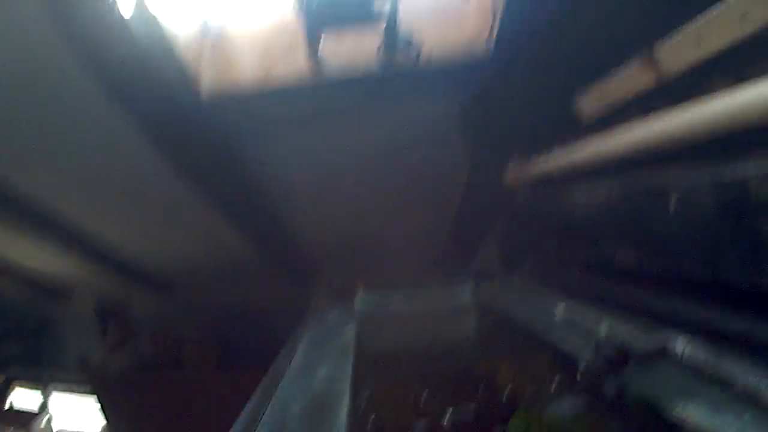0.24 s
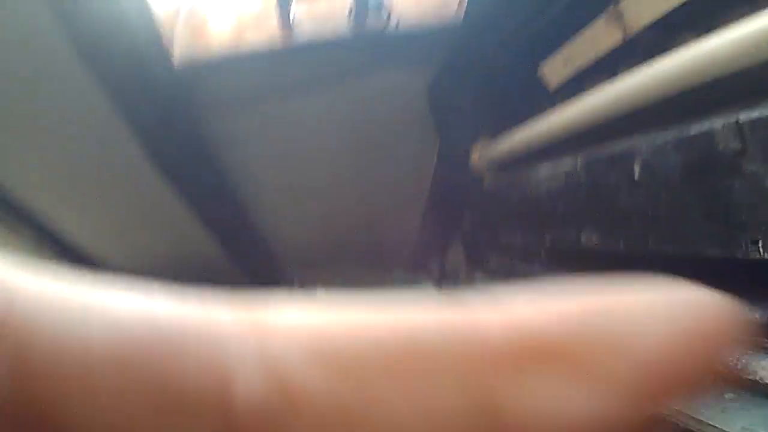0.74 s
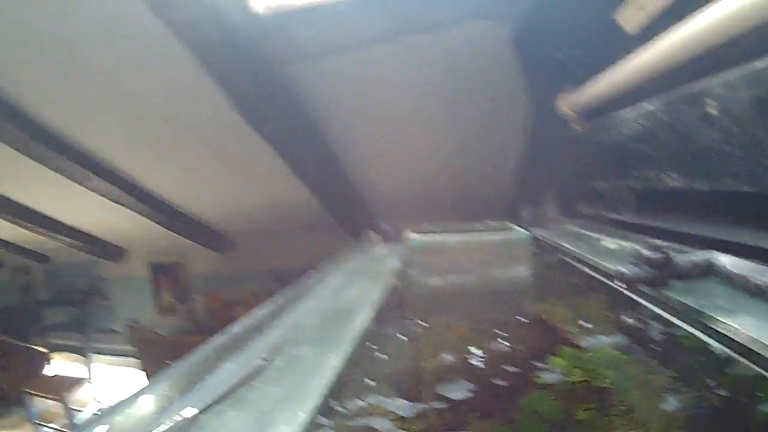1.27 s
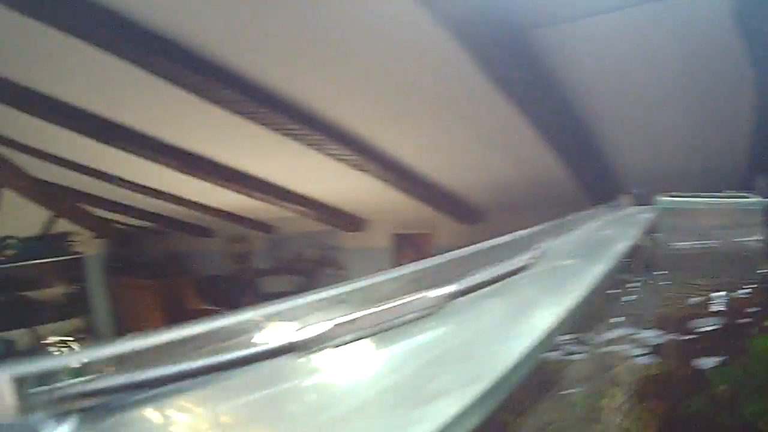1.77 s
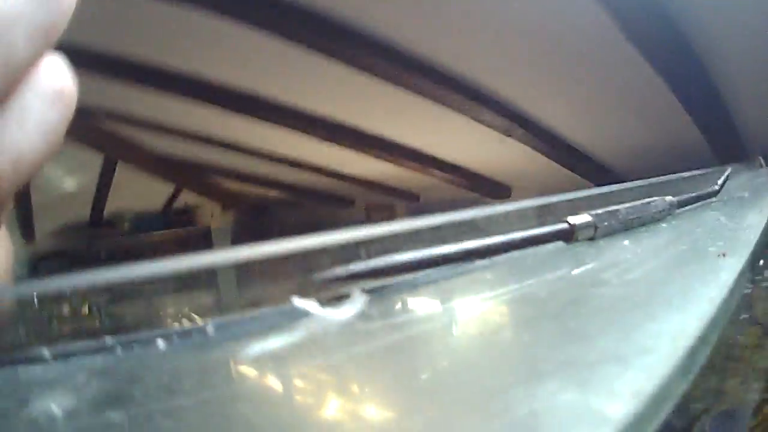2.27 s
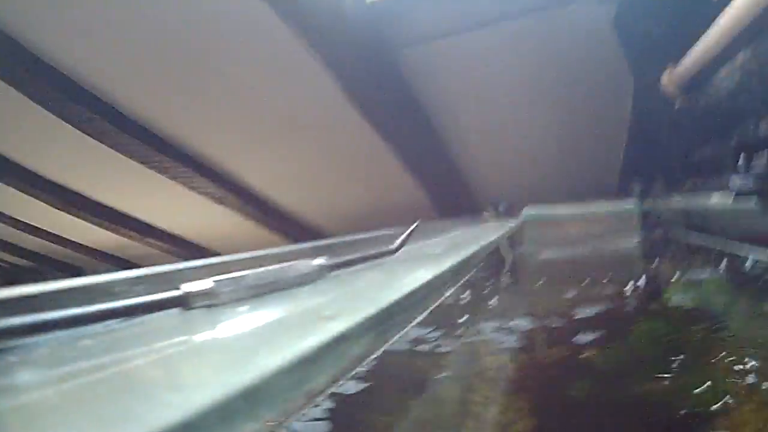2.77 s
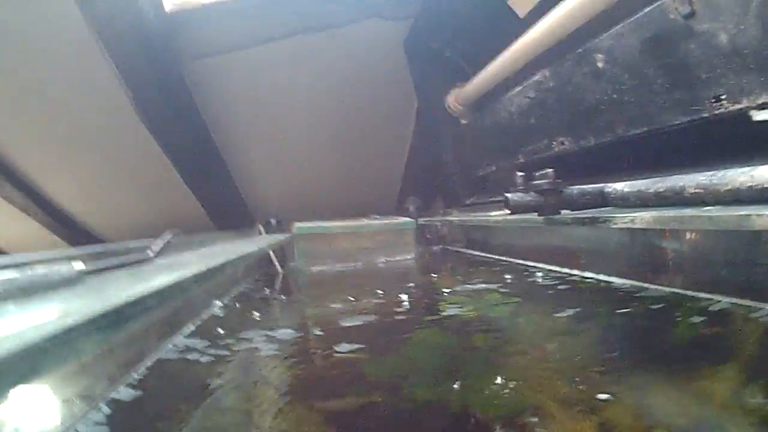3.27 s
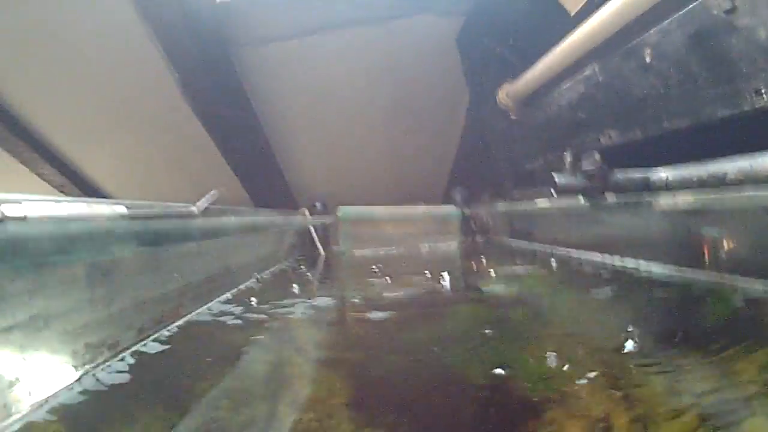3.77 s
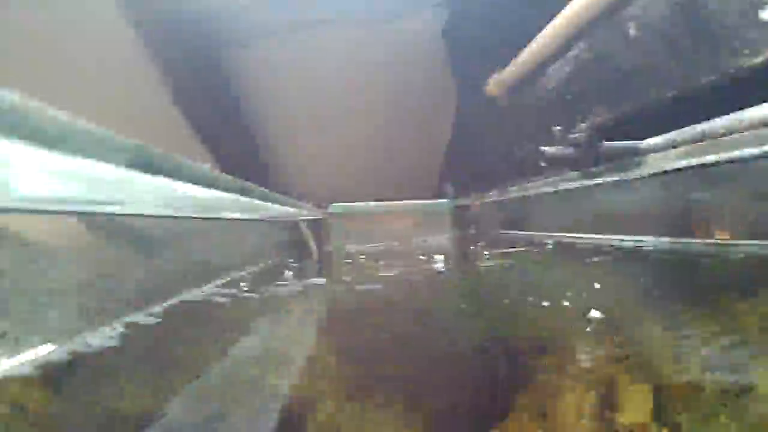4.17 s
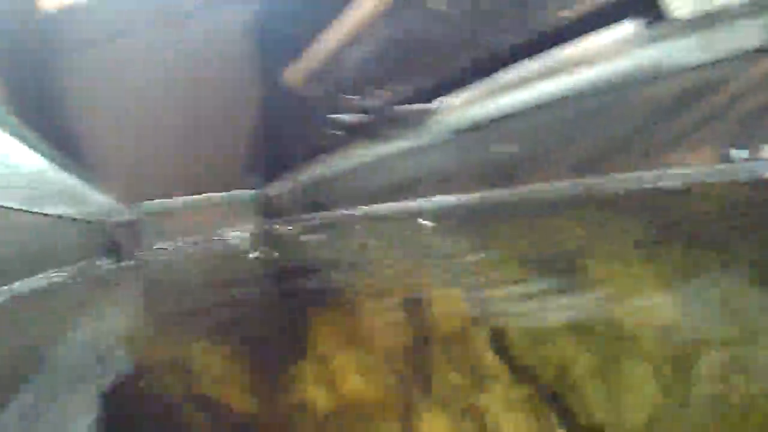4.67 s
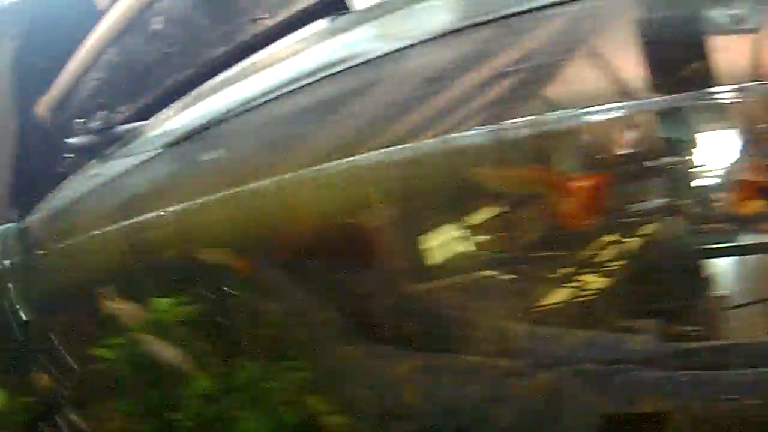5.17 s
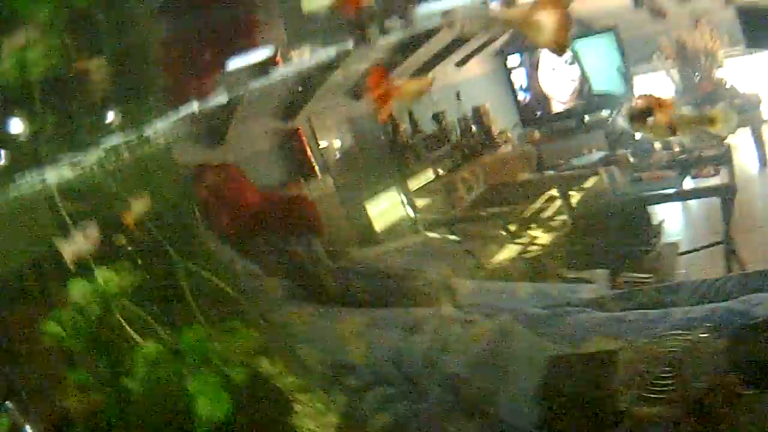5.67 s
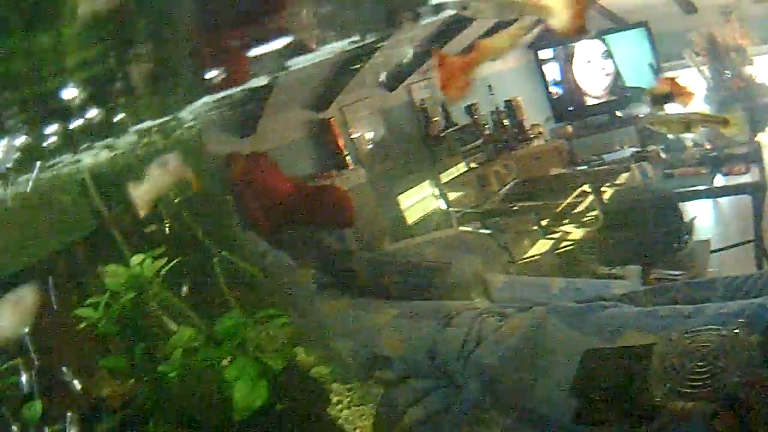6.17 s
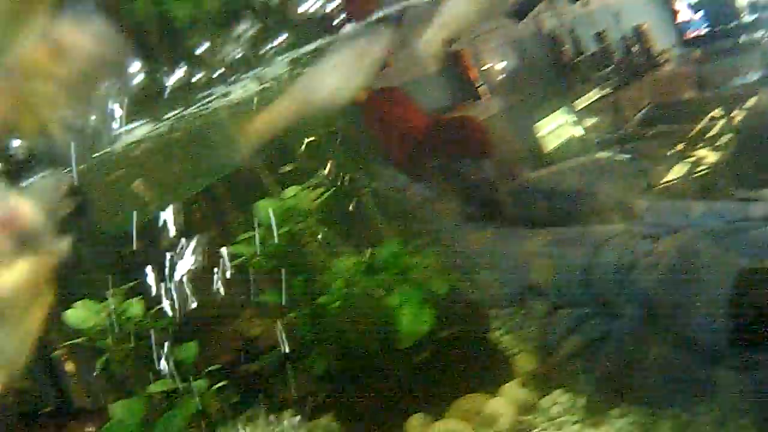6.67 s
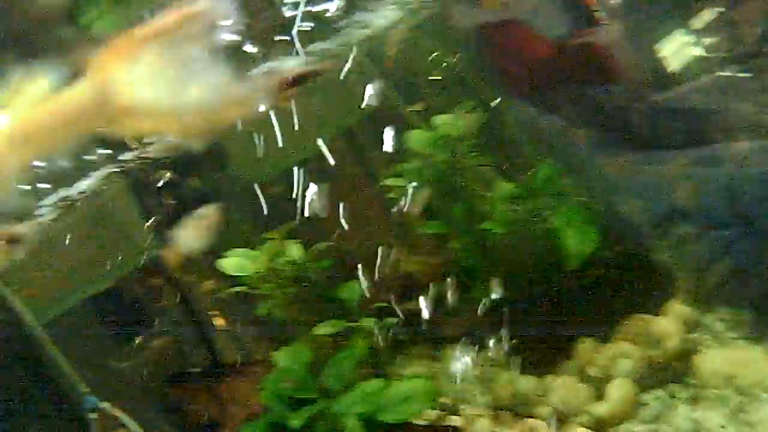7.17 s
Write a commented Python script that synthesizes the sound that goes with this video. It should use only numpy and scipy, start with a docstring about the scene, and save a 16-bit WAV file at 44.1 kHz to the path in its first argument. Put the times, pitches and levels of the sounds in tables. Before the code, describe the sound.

From inside a sealed plastic housing, close and muffled: a quick cluster of knocks with finger rubbing, a near-quiet pause, then loud hollow clacks. A juddering scrape on the glass rim quickens into crowded wet slips as the case goes under. Dull bumps follow, a heavy glassy boom rolls through the fish tank, and a low pump drone with watery wash takes over, dotted with soft round plops.

```python
"""Thuds, hollow knocks and a quickening judder, then wet slips, round plops, a glassy boom and a muffled drone.
A small camera in a waterproof housing is handled, bumped along the glass rim of a fish tank and dipped under.
Each contact pushes the trapped air (a filtered half-sine) and rings the shell (dying sines that water lowers).
Random grains through resonances make rubbing fingers, wet dragging, the pump with its air stream, and fizz.
Blows on the glass sound the tank's own modes; shaped noise gives the grip's rumble and the noise floor."""
import sys
import numpy as np
from scipy import signal
from scipy.fft import rfft, irfft
from scipy.io import wavfile
from scipy.ndimage import map_coordinates

SR = 44100
rng = np.random.default_rng(int(sys.argv[2]) if len(sys.argv) > 2 else 0)


def wav_record(signal):
    """Record a signal, one row per channel, as 16-bit PCM in the file named by sys.argv[1]."""
    frames = np.transpose(np.atleast_2d(signal))
    bounded = np.clip(frames, -1, 1)
    # unit amplitude maps onto the largest positive 16-bit level
    quanta = np.round(bounded * 32767).astype(np.int16)
    wavfile.write(sys.argv[1], SR, quanta)


N = 327663
TIME = np.arange(N) / SR
MAIN_HZ = 1220   # nominal main ring of the dry housing, the reference for added mass
# modes of the dry housing: f/Hz, level/dB, t60/s
HOUSING_MODES = [(526, -22.5, 0.041), (665.6, -18, 0.043), (808, -12.5, 0.037), (1235.8, -0.5, 0.034),
                 (1413, -21, 0.045), (1630, -7.5, 0.02), (2241, -17, 0.021), (2709, -16.5, 0.013),
                 (3155, -19.5, 0.018), (3422, -19.5, 0.011)]


def knocks():
    """Fingers and glass strike the housing, each time at another spot: a thud, a ring and a short crunch."""
    # single knocks: t/s, case pressed in +1 or released -1, push on the trapped air/dB, contact/ms,
    #                nominal main ring f/Hz, ring level/dB, clatter of the other modes against the ring/dB
    knock_rows = [(0.2447, -1, -15.5, 3.37, 998, -19, 8.5), (0.277, 1, -26, 2.4, 1320, -20.5, 2),
                  (0.3297, 1, 3, 7.2, 1170, -7.5, 7), (0.336, -1, -2.5, 1.54, 1294, -2.5, 0),
                  (0.3942, -1, -17, 4.4, 1320, -28, 11), (0.4463, 1, -10.5, 3.5, 1220, -20.5, 0.5),
                  (2.4002, -1, 8, 2.48, 722, 12, -5), (2.424, 1, -1, 5.45, 1180, 8.5, -2),
                  (2.654, -1, -5, 2.7, 1210, 1.5, 0), (2.9418, 1, -7, 5.65, 1168, 1, -1),
                  (2.9476, -1, -10.5, 5, 1202, 1, -1.5), (3.375, -1, -34, 8, 1220, -28, -2),
                  (4.093, 1, -10.5, 7.3, 1176, -19, 4), (4.5197, 1, -12.5, 5.5, 1224, -8, -2.5),
                  (4.7814, -1, -7, 2, 1084, -6.5, -2), (5.2765, -1, -8, 2.9, 1012, -10.5, 3.5),
                  (5.283, -1, -3, 2.8, 1017, -3.5, -10), (5.69, 1, 0, 5.17, 824, 2, 3.5),
                  (5.9768, -1, 11, 4.34, 844, -21.5, 19.5), (5.9808, 1, -10.5, 7.8, 719, -9, 0)]
    low_db, overtone_db, crunch_db = -0.25, 1.5, -20   # against the clatter
    slope_db = -1.8   # overtones, per octave
    out = np.zeros(N)
    for s, direction, push_db, contact_ms, main_hz, ring_db, clatter_db in knock_rows:
        others_db = ring_db + clatter_db
        ring = shell_ring(main_hz, ring_db, others_db + low_db, others_db + overtone_db, slope_db)
        push = np.sign(direction) * from_db(push_db)
        add(out, s, contact(push, contact_ms, ring, grit_db=-15.5, release_db=-16.5))
        add(out, s, crunch(others_db + crunch_db, t60=0.043, low_hz=300, top_hz=2800))
    return out


def judder():
    """Dry plastic catches on the rim and lets go, at first ever faster; harder catches ring brighter."""
    # catches on the glass rim: t/s, push level/dB, main ring level/dB, overtone level/dB
    catches = [(3.0391, 3.5, -13, -1.5), (3.1914, -4, -17.5, -4.5), (3.54, 3, -1.5, 2),
               (3.6495, 1, -12, -8.5), (3.7606, 2.5, -6, -2), (3.8606, -3.5, -26, -5.5),
               (3.9349, -1, -11, -2), (3.993, -2.5, -9.5, -5.5), (4.059, -4, -15.5, -12),
               (4.132, -2.5, -6.5, -2.5), (4.1666, -3, -10, -10), (4.1957, -5, -13, -8),
               (4.224, -7.5, -17.5, -19.5), (4.2545, -10.5, -24.5, -15), (4.282, -10.5, -28, -30.5),
               (4.3624, -5, -7.5, -3.5), (4.4184, -10.5, -14, -18), (4.488, -11, -32, -29)]
    contact_ms, main_hz = 12.9, 1191
    low_db, low_follows = -3, 0.8   # low modes at 0 dB push; dB per dB of push
    slope_db, brightens = 5.5, 0.85   # overtones per octave at 0 dB push; dB per dB of push
    snap_db, snap_follows, snap_hz = -5, 2.4, 2950   # at 0 dB overtones; dB per dB of overtones
    out = np.zeros(N)
    for s, push_db, ring_db, overtone_db in catches:
        modes_below_db = low_db + low_follows * push_db
        brightness_db = slope_db + brightens * push_db
        ring = shell_ring(main_hz, ring_db, modes_below_db, overtone_db, brightness_db)
        add(out, s, contact(-from_db(push_db), contact_ms, ring, grit_db=-23, release_db=-19.5))
        add(out, s, snap(snap_db + snap_follows * overtone_db, snap_hz))
    return out


def slips():
    """Short wet slips press the case in; the harder the push, the more the side modes speak."""
    # sticking and slipping at the water line: t/s, push level/dB, contact/ms, main ring level/dB
    slip_rows = [(4.3203, -0.5, 7.4, -9.5), (4.401, -5.5, 6.9, -8.5), (4.4394, -5.5, 6.3, -8),
                 (4.47, -8, 6.6, -14.5), (4.499, -18, 10, -20.5), (4.54, -12, 5.1, -21),
                 (4.549, -15, 3, -12), (4.567, -7.5, 4.95, -13.5), (4.5861, -13, 3.9, -12),
                 (4.6027, -3, 4.5, -6), (4.6362, -1.5, 3.7, -9.5), (4.6659, 3.5, 4.25, -5.5),
                 (4.7199, 4.5, 4.4, -5), (4.7749, 2.5, 3, -5), (4.8066, -1.5, 3.8, -8.5),
                 (4.8364, 3, 3.97, -12), (4.8863, 2, 3.35, 0.5), (4.9347, -2.5, 4.9, -4.5),
                 (4.99, 2.5, 9.9, -20), (5.027, -6, 9, -17.5), (5.0611, -8, 11, -15)]
    # each level at 0 dB push, then its rise in dB per dB of push
    low_db, low_follows = -9, 1.9
    overtone_db, overtone_follows, slope_db = -2.5, 0.91, -5   # slope per octave
    crunch_db, crunch_follows = -16.5, 0.75
    out = np.zeros(N)
    for s, push_db, contact_ms, ring_db in slip_rows:
        modes_below_db = low_db + low_follows * push_db
        modes_above_db = overtone_db + overtone_follows * push_db
        ring = shell_ring(slip_ring_hz(s), ring_db, modes_below_db, modes_above_db, slope_db)
        add(out, s, contact(from_db(push_db), contact_ms, ring, grit_db=-13.5, release_db=-19))
        add(out, s, crunch(crunch_db + crunch_follows * push_db, t60=0.041, low_hz=435, top_hz=2115))
    return out


def bumps():
    """The case springs back under the water with a dull thud and hardly any ring."""
    # dull bumps: t/s, push level/dB
    bump_rows = [(4.9548, -3.5), (5.0864, -6.5), (5.131, -9.5), (5.153, -14), (5.1796, -9), (5.209, -13.5),
                 (5.2241, -10.5)]
    ring_db, low_db, overtone_db, slope_db = -21.5, -18, -15, 2.3   # before the push gain; slope per octave
    out = np.zeros(N)
    for s, push_db in bump_rows:
        ring = shell_ring(slip_ring_hz(s), ring_db, low_db, overtone_db, slope_db)
        bump = contact(-0.96, 4.52, ring, grit_db=-7, release_db=-17)
        add(out, s, from_db(push_db) * bump)
    return out


def taps(low_hz):
    """Light touches under water ring the shell with a round plop and only a faint thud."""
    # soft taps: t/s, level/dB, hardness as a low-pass corner f/Hz, overtone boost/dB
    tap_rows = [(6.532, -42, 3100, 20), (6.6272, -1.5, 660, -5), (7.2412, -9.5, 1510, 9),
                (7.395, -4, 680, -4.5)]
    # modes of the sunken housing: f/Hz, level/dB, t60/s
    sunken_modes = [(610, -24.5, 0.16), (660, 1, 0.052), (743, -3.5, 0.043), (1217, -8, 0.021),
                    (1625, -11.5, 0.029), (2660, -22, 0.0139)]
    thud_db, contact_ms = -21.5, 2.2   # push on the trapped air, against the tap's level
    hz, mode_db, t60 = np.transpose(sunken_modes)
    upper = hz > 1000
    out = np.zeros(N)
    for s, db, hardness_hz, overtone_db in tap_rows:
        gains = from_db(db + mode_db + overtone_db * upper)
        plop = cut(ringing(hz, gains, t60, TIME[:SR // 8]), hardness_hz, "low")
        plop = cut(plop, low_hz, "high", order=5)
        add(out, s, plop + thud(from_db(db + thud_db), contact_ms))
    return out


def tank():
    """Under water, a blow on the glass booms through the whole tank and shakes its water."""
    # blows that set the filled tank ringing: t/s, level/dB
    blows = [(5.2836, -26), (5.687, -16.5), (5.979, -2.5), (7.244, -30.5)]
    # modes of the glass and its water: f/Hz, level/dB, t60/s
    tank_modes = [(142.8, -0.5, 0.16), (184, -11, 0.049), (224, -2.5, 0.1), (331.4, -4, 0.12),
                  (483, -25.5, 0.19), (753, -2, 0.074)]
    slosh_db, slosh_t60_s = -18, 0.27   # the shaken water, against the blow
    hz, mode_db, t60 = np.transpose(tank_modes)
    out = np.zeros(N)
    for s, db in blows:
        add(out, s, ringing(hz, from_db(db + mode_db), t60, TIME[:SR // 2]))
        add(out, s, crunch(db + slosh_db, slosh_t60_s, low_hz=109, top_hz=304))
    return out


def after_ring(hits, level_db, t60, low_hz):
    """Glass and room answer each hit with a faint diffuse tail of decaying noise."""
    t = TIME[:SR // 2]
    tail = rng.standard_normal(len(t)) * np.exp(-np.log(1000) * t / t60)
    tail = tail / np.sqrt(np.sum(tail ** 2))
    return from_db(level_db) * signal.fftconvolve(cut(hits, low_hz, "high"), tail)[:N]


def dragging(main_hz, damping, bright_db):
    """Wet plastic sticks and slips on the glass; its friction grains ring the water-loaded shell."""
    # the housing dragging along the glass as it goes under: t/s, level/dB
    drag_curve = [(4.1, -92.5), (4.3, -48), (4.42, -38.5), (4.58, -37.5), (4.75, -42.5), (5.22, -41),
                  (5.33, -54.5), (5.6, -87)]
    flutter_db = 3
    friction = grains(per_s=500, spread_db=2.5) * from_db(flutter_db * drift(89))
    shell = np.zeros(N)
    for k, (hz, db, t60) in enumerate(HOUSING_MODES):
        octaves_away = abs(np.log2(hz / MAIN_HZ))
        mode = resonate(friction, loaded(hz, main_hz), damping / t60)
        shell += (-1) ** k * from_db(db + bright_db * octaves_away) * mode
    return from_db(in_time(drag_curve)[0]) * rms_one(shell)


def rubbing():
    """Tiny slips of skin on dry plastic excite the resonances of the hand-held shell."""
    # finger strokes: t/s, length/s, level/dB that the swell heads for
    rub_rows = [(0.07, 0.0041, -41), (0.112, 0.16, -44), (0.24, 0.12, -36), (0.36, 0.14, -40.5),
                (0.447, 0.08, -25), (0.53, 0.048, -32), (0.575, 0.06, -40.5), (0.7, 0.041, -48),
                (0.805, .04, -46.5), (0.858, 0.018, -43), (0.895, 0.03, -50.5), (1.608, 0.0067, -42),
                (1.66, 0.031, -51), (1.753, 0.013, -46), (1.805, 0.015, -50.5), (1.875, 0.027, -42),
                (1.96, 0.08, -56.5), (2.782, 0.011, -47.5), (2.995, 0.028, -48.5), (3.117, 0.051, -48.5)]
    # resonances of the hand-held shell: f/Hz, width/Hz, level/dB
    held_modes = [(824, 32, -9.5), (1221, 132, 0.5), (1710, 93, -5.5), (1750, 1100, -15), (2494, 160, -9.5),
                  (2540, 490, -19.5), (3700, 230, -26)]
    skin = grains(per_s=2500, spread_db=3.5) * from_db(2.2 * drift(60))
    shell = np.zeros(N)
    for k, (hz, width_hz, db) in enumerate(held_modes):
        shell += (-1) ** k * from_db(db) * resonate(skin, hz, width_hz)
    return strokes(rub_rows, attack_s=0.0065, release_s=0.015) * rms_one(cut(shell, 150, "high"))


def grip():
    """The hand's changing pressure flexes the sealed case: a slow rumble of shaped noise."""
    # pressure of the grip: t/s, level/dB
    grip_curve = [(0, -36), (.25, -28), (.44, -19.5), (.7, -34.5), (1.1, -35), (2.3, -41), (3.05, -29.5),
                  (3.42, -36.5), (3.7, -26.5), (5.2, -32), (5.45, -44), (7.43, -41.5)]
    # rumble spectrum: f/Hz, relative level per Hz/dB
    grip_colour = [(12, 3.5), (22, 2.5), (35, -15.5), (60, -22.5), (120, -31), (250, -38), (500, -60.5)]
    rumble = cut(coloured(rng.standard_normal(N), grip_colour), 9.8, "high")
    return from_db(in_time(grip_curve)[0]) * rms_one(rumble)


def pump(pump_db, wet_hz, width_hz, drone_db, wash_db):
    """Churning water and the air stream drone through the gliding resonance of the wet shell, over a wash."""
    # wash spectrum: f/Hz, relative level per Hz/dB
    wash_colour = [(60, 2.5), (200, -1), (400, -3.5), (700, -4), (1100, -23), (1400, -4.5), (1620, 6),
                   (1900, -7.5), (2300, -17.5), (2800, -11.5), (3300, -15.5), (3900, -17)]
    churn = grains(per_s=9000, spread_db=6.5) * from_db(1.9 * drift(36))
    drone = resonate(resonate(churn, wet_hz, width_hz), wet_hz, width_hz)
    wash = coloured(grains(per_s=5700, spread_db=2.5), wash_colour)
    return from_db(pump_db) * (from_db(drone_db) * rms_one(drone) + from_db(wash_db) * wash)


def fizz():
    """Clouds of fine bubbles pass the housing: dense grains through two broad resonances."""
    # bubble clouds: t/s, length/s, level/dB that the swell heads for
    clouds = [(6.37, 0.23, -50.5), (7.24, 0.085, -45.5)]
    bubbles = resonate(resonate(grains(per_s=1500, spread_db=2), 2630, 590), 2450, 970)
    return strokes(clouds, attack_s=0.066, release_s=0.035) * rms_one(bubbles)


def noise_floor(level_db):
    """A faint steady bed of shaped noise."""
    # bed spectrum: f/Hz, relative level per Hz/dB
    floor_colour = [(40, -10), (100, -3), (250, -1.5), (500, -6.5), (900, -9), (1220, -9), (1500, -8.5),
                    (2200, -14.5), (3000, -15), (3900, -15)]
    return from_db(level_db) * coloured(rng.standard_normal(N), floor_colour)


def contact(push, contact_ms, ring, grit_db, release_db):
    """One contact: a thud, and the shell's ring set off by the chattering touch."""
    rung = signal.fftconvolve(ring, chatter(contact_ms, grit_db, release_db))[:len(ring)]
    return thud(push, contact_ms) + cut(rung, 483, "high", order=3)


def thud(push, contact_ms):
    """A soft half-sine push on the trapped air."""
    phase = np.minimum(TIME[:SR // 8] * 1000 / contact_ms, 1)
    return cut(push * np.sin(np.pi * phase), 454, "low", order=1)


def chatter(contact_ms, grit_db, release_db):
    """A contact is a first touch, a few gritty slips while it lasts, and a tick as it lets go."""
    length = max(int(contact_ms * SR / 1000), 2)
    at, size = rng.random(6), rng.standard_normal(6)
    force = np.zeros(length)
    force[(at * length).astype(int)] = from_db(grit_db) * size
    force[0], force[-1] = 1, -from_db(release_db)
    return force


def shell_ring(main_hz, main_db, low_db, overtone_db, slope_db, build_cycles=0.36):
    """The shell's main mode, the modes below it and its overtones, each group at its own level."""
    hz, mode_db, t60 = np.transpose(HOUSING_MODES)
    octaves, t = np.log2(hz / hz[3]), TIME[:SR // 8]   # row 3 is the main mode
    signs = np.where(hz > 2000, (-1) ** np.arange(1, len(hz) + 1), 1)
    groups = [octaves < 0, octaves > 0]
    db = mode_db + np.select(groups, [low_db, overtone_db + slope_db * octaves], main_db)
    # each spot of the shell tunes the overtones a little differently
    detune = 1 + 0.034 * rng.standard_normal(len(hz)) * (octaves > 0)
    ring = ringing(loaded(hz, main_hz) * detune, signs * from_db(db), t60, t)
    return ring * (1 - np.exp(-t * main_hz / build_cycles))   # the swing takes a moment to build


def slip_ring_hz(s):
    """Nominal main ring of the shell while it crosses the water line."""
    # half-sunken shell: t/s, nominal main ring f/Hz
    ring_curve = [(4.3, 826), (4.84, 786), (4.92, 1023), (5.06, 930), (5.22, 815)]
    return np.interp(s, *np.transpose(ring_curve))


def loaded(hz, main_hz):
    """Water or a firm grip adds mass: low modes drop with the main ring, overtones less."""
    return hz * (main_hz / MAIN_HZ) ** np.minimum(1, MAIN_HZ / hz)


def crunch(db, t60, low_hz, top_hz):
    """Many small modes dying together, as a short rough burst of noise."""
    t = TIME[:SR // 4]
    noise = cut(rng.standard_normal(len(t)), low_hz, "high")
    noise = rms_one(cut(noise, top_hz, "low", order=4))
    return from_db(db) * noise * np.exp(-np.log(1000) * t / t60)


def snap(db, hz):
    """A single sharp swing of the plastic: one sine cycle."""
    return from_db(db) * np.sin(2 * np.pi * np.minimum(hz * TIME[:SR // 8], 1))


def ringing(hz, gains, t60, t):
    """Sum of dying sines."""
    decay = np.exp(-np.log(1000) * t / t60[:, None])
    return gains @ (np.sin(2 * np.pi * hz[:, None] * t) * decay)


def strokes(rows, attack_s, release_s):
    """Gain of a series of strokes, each swelling, holding and dying away; overlaps add in power."""
    t, power = TIME[:SR], np.zeros(N)
    for s, length_s, db in rows:
        swell = 1 - np.exp(-t / attack_s)
        fade = np.exp(-np.maximum(t - length_s, 0) / release_s)
        add(power, s, (from_db(db) * swell * fade) ** 2)
    return np.sqrt(power)


def grains(per_s, spread_db):
    """Random tiny clicks of uneven size; rms 1."""
    sizes = from_db(spread_db * np.minimum(rng.exponential(1, N), 4)) * rng.choice([-1, 1], N)
    return rms_one(sizes * (rng.random(N) < per_s / SR))


def drift(per_s):
    """Random wander through per_s new values a second, with a spread near 1."""
    knots = rng.standard_normal(4000)
    return np.interp(TIME * per_s, np.arange(len(knots)), knots)


def resonate(x, hz, width_hz):
    """A two-pole resonance whose centre may glide, stepped block by block."""
    hz, out, state = np.broadcast_to(hz, N), np.zeros(N), np.zeros(2)
    r, block = np.exp(-np.pi * width_hz / SR), 1024
    zeros = [(1 - r * r) / 2, 0, (r * r - 1) / 2]
    for i in range(0, N, block):
        poles = [1, -2 * r * np.cos(2 * np.pi * hz[i] / SR), r * r]
        out[i:i + block], state = signal.lfilter(zeros, poles, x[i:i + block], zi=state)
    return out


def coloured(x, colour):
    """Give a steady sound a spectrum; rms 1."""
    hz, db = np.transpose(colour)
    f = np.maximum(np.arange(N // 2 + 1) * SR / N, 1)
    gain = from_db(np.interp(np.log(f), np.log(hz), db, right=-120))
    return rms_one(irfft(rfft(x) * gain, N))


def cut(x, hz, kind, order=2):
    """Butterworth high- or low-pass."""
    return signal.sosfilt(signal.butter(order, hz, kind, fs=SR, output="sos"), x + 1e-18)


def from_db(db):
    """Decibels to gain."""
    return 10 ** (np.asarray(db) / 20)


def rms_one(x):
    """Scale to unit power."""
    return x / np.sqrt(np.mean(x ** 2) + 1e-20)


def in_time(rows):
    """Each column of a curve at every sample."""
    s, *columns = np.transpose(rows)
    return [np.interp(TIME, s, c) for c in columns]


def add(track, s, sound):
    """Mix a sound in at a time."""
    i = int(round(s * SR))
    track[i:i + len(sound)] += sound[:N - i]


def scene():
    """Everything reaches the microphone through the sealed housing, alike on both sides."""
    # pump and air stream through the water: t/s, level before the drone and wash shares/dB,
    #                                        lower resonance of the wet housing f/Hz
    pump_curve = [(0, -85.5, 1134), (4.2, -83, 1195), (4.9, -52, 1096), (5.35, -53, 960), (5.6, -45, 879),
                  (5.9, -46.5, 790), (6.15, -45, 701), (6.5, -43.5, 713), (6.9, -46.5, 680),
                  (7.43, -45.5, 649)]
    pump_db, wet_hz = in_time(pump_curve)
    hits = knocks() + judder() + slips() + bumps() + tank() + taps(low_hz=435)
    hits = hits + after_ring(hits, level_db=-33, t60=0.18, low_hz=398)
    handling = rubbing() + dragging(wet_hz, damping=7.6, bright_db=3.5) + grip()
    water = pump(pump_db, wet_hz, width_hz=260, drone_db=-4.5, wash_db=-3.5) + fizz()
    inside = cut(hits, 38.6, "high") + handling + water + noise_floor(level_db=-56.5)
    return np.array([inside, inside])


def record(dry):
    """A narrow-band microphone channel overloads on hard knocks; the left side runs a little late."""
    left_lag = 5.27   # samples
    narrow = cut(dry, 4140, "low", order=6)
    narrow = signal.sosfilt(signal.cheby2(12, 70, 5000, fs=SR, output="sos"), narrow)
    left, right = narrow / (1 + narrow ** 30) ** (1 / 30)   # almost a hard clip at full scale
    left = map_coordinates(left, [np.arange(N) - left_lag], order=3)
    return cut(np.array([left, right]), 16500, "low", order=12)


dry = scene()
out = record(dry)
wav_record(out)
```